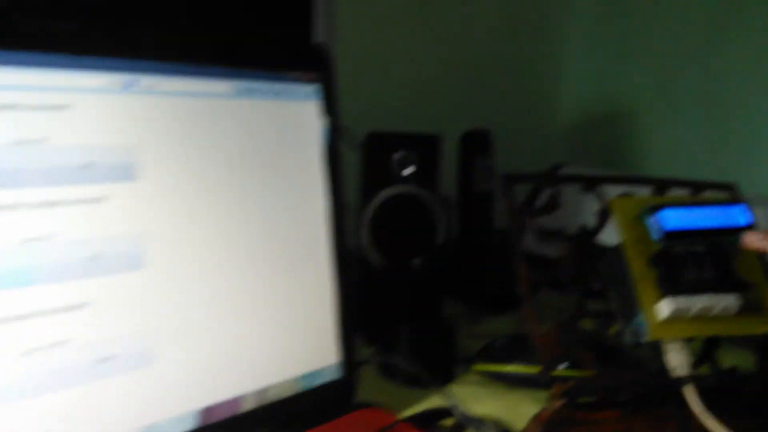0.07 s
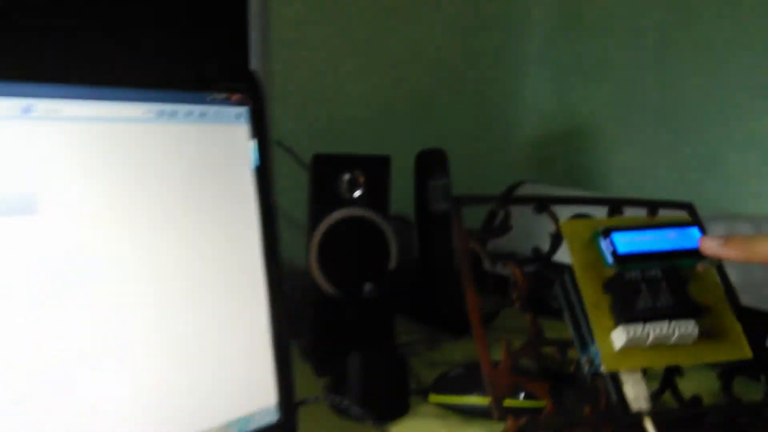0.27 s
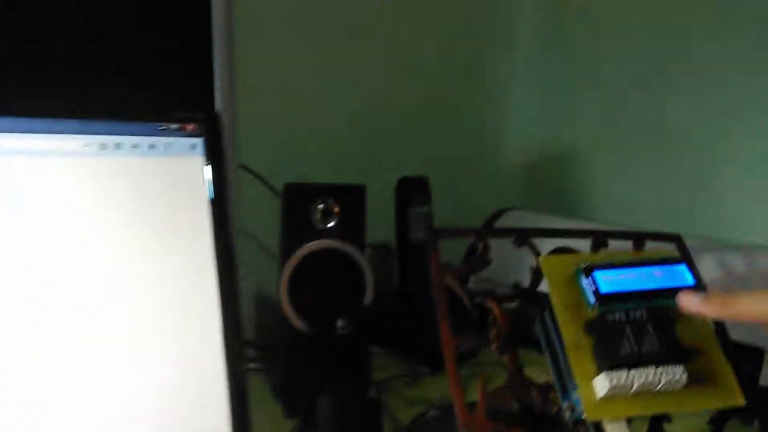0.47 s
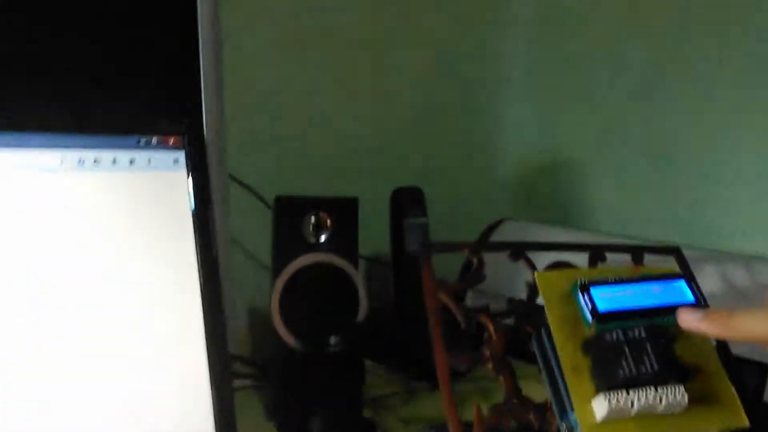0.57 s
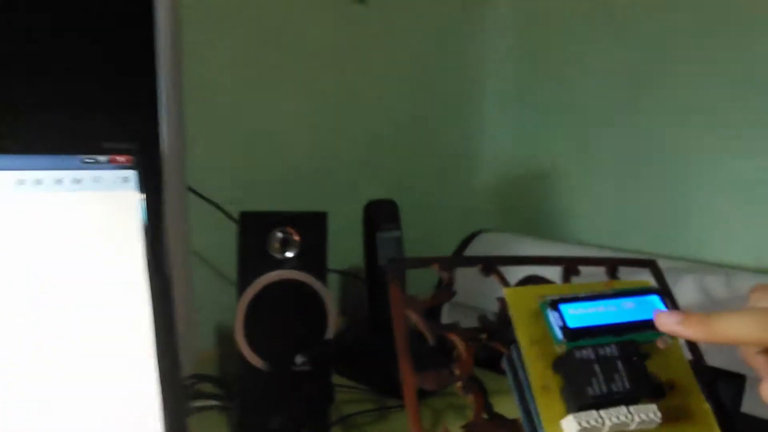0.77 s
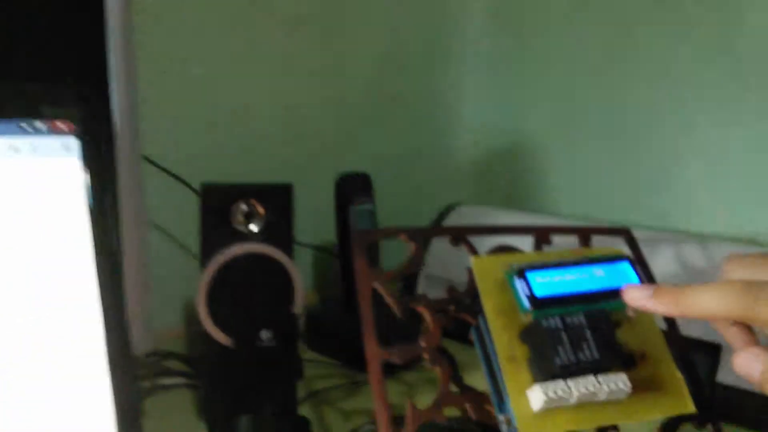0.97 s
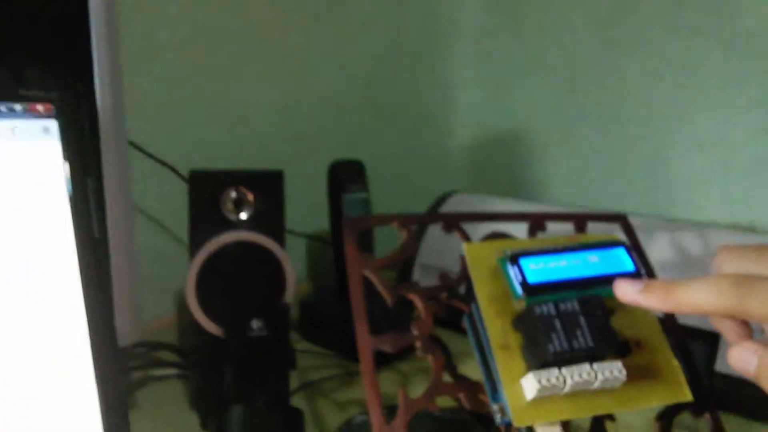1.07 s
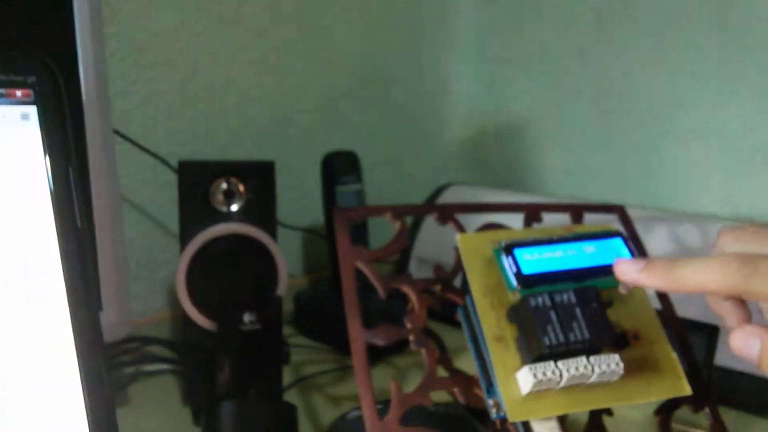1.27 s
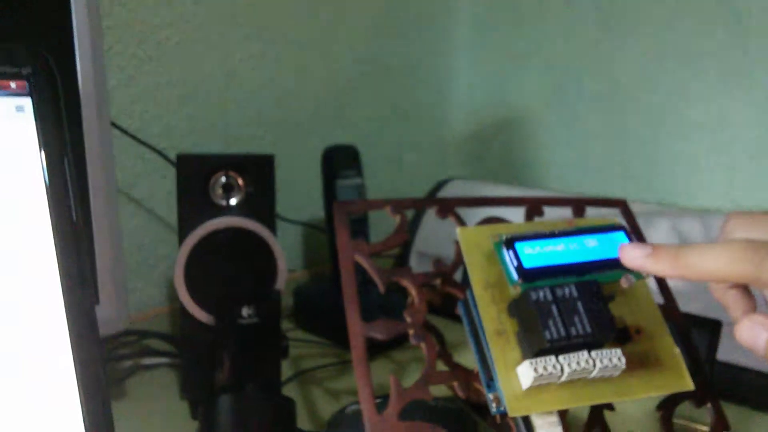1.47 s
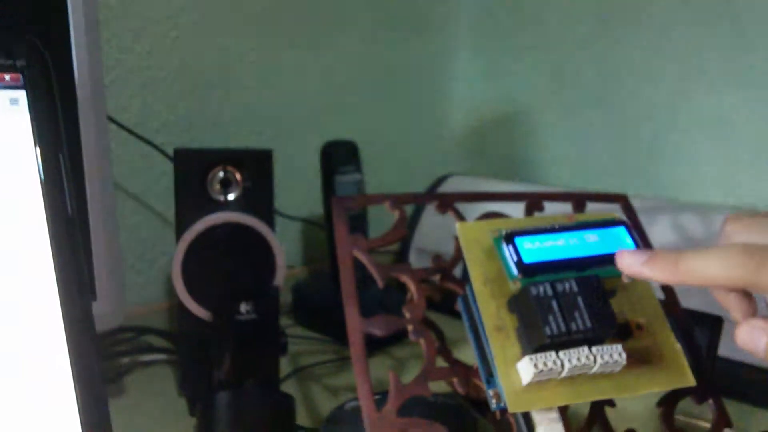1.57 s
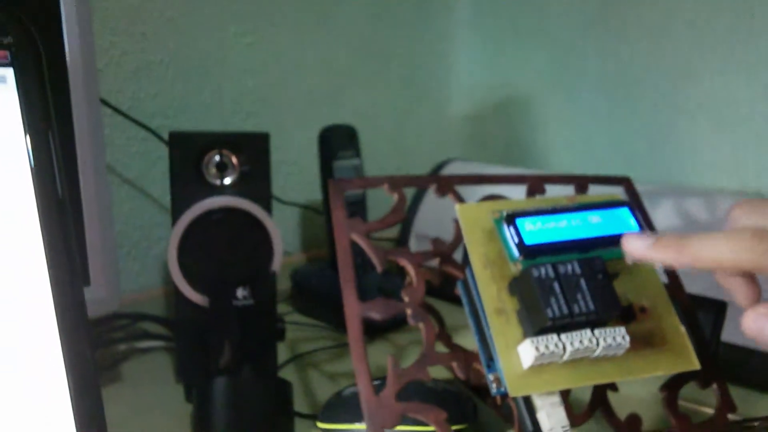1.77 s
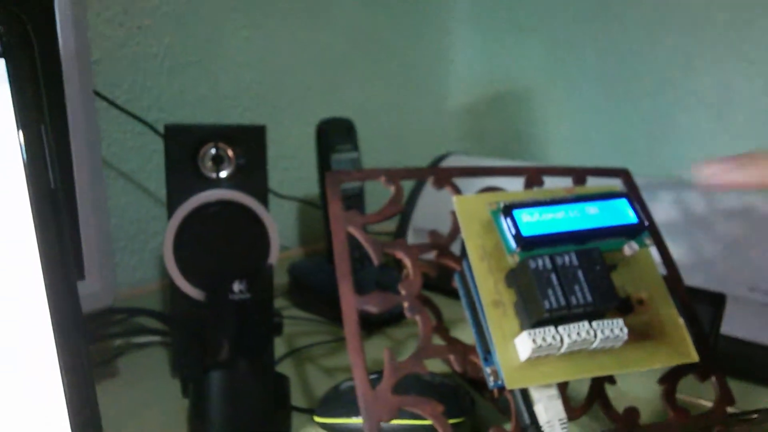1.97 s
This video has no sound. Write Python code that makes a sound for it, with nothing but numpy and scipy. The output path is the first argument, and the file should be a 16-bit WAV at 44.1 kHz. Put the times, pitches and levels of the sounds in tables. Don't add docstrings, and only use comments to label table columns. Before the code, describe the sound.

A relay on a bare circuit board switches on and off with seven short, bright clicks, evenly spaced, in a small hard room; close handheld microphone with faint hiss, fan whine and slight handling bumps.

```python
import sys
import numpy as np
from scipy import signal
from scipy.fft import rfft, irfft
from scipy.io import wavfile
from scipy.ndimage import uniform_filter1d

SR = 44100
rng = np.random.default_rng(int(sys.argv[2]) if len(sys.argv) > 2 else 0)


def output_pcm(signal):
    pcm = np.clip(np.atleast_2d(signal).T, -1, 1) * 32767
    wavfile.write(sys.argv[1], SR, np.round(pcm).astype(np.int16))


def how_loud(loudness_db):
    steps = np.asarray(loudness_db, float) / 20
    return 10 ** steps


N = 89567

# start_s, level_db, board_knock_db, spring_db, case_ring_db
PULL_INS = [
    (.0412, -27, -9, -5.5, 0),
    (.6503, -27, -0.5, -2, 0),
    (1.2482, -28.5, 0.5, 1, 2),
    (1.7686, -28.5, -0.5, 2.5, 3),
]
# start_s, level_db, board_knock_db, spring_db, case_ring_db
DROP_OUTS = [
    (.4104, -34, 3.5, -8, 0),
    (1.0015, -32, -6, -2, 1),
    (1.559, -34, -4.5, -3.5, 1.5),
]
# pitch_hz, level_db, t60_s, spread_hz
PULL_TONES = [(2060, -2.5, 0.049, 110), (7110, -6, 0.049, 760), (400.7, -51, .15, 99), (548, -50, 0.48, 37),
              (859, -38.5, 0.22, 100), (1219, -32.5, 0.13, 100), (1795, -20.5, 0.059, 280),
              (2131.5, -8.5, 0.1, 96), (2960, -22.5, 0.092, 37), (3167, -18.5, 0.11, 150),
              (4440, -19.5, 0.053, 150), (8186, -6.5, .05, 250), (8570, -4.5, 0.021, 160),
              (12340, 3, 0.016, 2000)]
DROP_TONES = [(2937, 1, 0.074, 67), (5150, -10, 0.18, 350), (393, -45.5, 0.11, 270), (583, -44, 0.37, 27),
              (1642, -19, 0.074, 150), (1828, -18.5, 0.13, 86), (2093, -11.5, 0.019, 89),
              (2320, -20, 0.24, 24.5), (2388, -14, .08, 31), (3100, -13.5, .07, 50),
              (4170, -14.5, 0.046, 450), (6875, -2.5, 0.031, 950), (8360, -6.5, 0.014, 910),
              (12800, 7, .013, 570)]
# pitch_hz, level_db (per Hz)
PULL_SIZZLE = [(400, -49.5), (1300, -28), (2100, -6), (3600, -11), (5300, -7.5), (8300, -1.5),
               (11000, -4.5), (16000, -5)]
DROP_SIZZLE = [(400, -50.5), (1200, -23.5), (2600, -0.5), (3600, -8.5), (5200, -2.5), (8000, -4.5),
               (12700, 0), (16000, -3.5)]
# bounce_gap_s, loss_per_bounce_db, sizzle_db, sizzle_t60_s, echo_db, late_wash_db
PULL_FEEL = (.0022, -1, 4.5, 0.0547, -5, -24)
DROP_FEEL = (.0015, -3.5, 6.5, 0.1128, -6.5, -19)
# pitch_hz, t60_s
ROOM_FADE = [(500, 0.82), (1500, 0.32), (3500, 0.26), (9000, 0.2), (15000, 0.043)]
# start_s, length_s, level_db, pitch_hz
BUMPS = [
    (0.044, 0.027, -61, 97.6),
    (0.092, 0.033, -65.5, 73.6),
    (0.269, 0.012, -60, 99),
    (0.289, 0.011, -60, 95),
    (0.311, 0.016, -58, 104),
    (.595, .02, -63, 85),
    (0.627, 0.026, -70, 45),
    (1.412, 0.018, -70.5, 91),
]
# pitch_hz, width_hz, level_db
FAN_TONES = [(860, 71, -86.5), (1141, 52, -77), (1324, 140, -75), (15550, 300, -78)]
# time_s, level_db
WHINE_LEVEL = [(0, -83.5), (.7, -81.5), (.92, -78), (1.401, -74), (2.03, -72.5)]
# pitch_hz, level_db (per Hz)
HISS_COLOUR = [(25, -42), (60, -18), (250, -12.5), (550, -12.5), (900, -0.5), (2200, -3), (4500, -10.5),
               (15500, -15)]

LATE_T60_S = 0.69


def relay():
    out = np.zeros(N)
    for row in PULL_INS:
        add(out, *stroke(row, PULL_TONES, PULL_SIZZLE, PULL_FEEL))
    for row in DROP_OUTS:
        add(out, *stroke(row, DROP_TONES, DROP_SIZZLE, DROP_FEEL))
    earlier_s, earlier_db = 0.17, -43.5
    t = np.arange(N) / SR
    fade = how_loud(earlier_db - 60 * (t + earlier_s) / LATE_T60_S)
    return out + fade * coloured(DROP_SIZZLE, N)


def stroke(row, tones, sizzle, feel):
    start_s, level_db, knock_db, spring_db, ring_db = row
    gap_s, loss_db, sizzle_db, sizzle_t60, echo_db, late_db = feel
    treble_rise_s, echo_rise_s = 0.00024, 0.0033
    extra_db = [knock_db, spring_db] + [ring_db * (tone[0] > 4000) for tone in tones[2:]]
    tones = [(hz, db + more, t60, spread) for (hz, db, t60, spread), more in zip(tones, extra_db)]
    t = np.arange(SR) / SR
    luck = rng.random((len(tones), 4))

    bounce = np.arange(4)[:, None]
    since = t - bounce * gap_s * (0.98 + 0.21 * luck[0, :, None])
    rattle = how_loud(loss_db * bounce - 60 * since / sizzle_t60) * np.clip(since / treble_rise_s, 0, 1)
    sound = how_loud(sizzle_db + ring_db) * rattle.max(0) * coloured(sizzle, SR)

    late_wash = how_loud(late_db - 60 * t / LATE_T60_S) * coloured(sizzle, SR)
    room = how_loud(echo_db) * room_echo(tones, sizzle, SR) + late_wash
    sound += room * (1 - np.exp(-(t / echo_rise_s) ** 2))

    for tone, chance in zip(tones, luck):
        sound += ringing_tone(t, tone, chance, treble_rise_s)
    return start_s, how_loud(level_db) * sound


def ringing_tone(t, tone, chance, treble_rise_s):
    hz, level_db, t60, spread = tone
    drive_s = 0.0041
    swing = t - 0.004
    treble = np.clip((hz - 3000) / 3000, 0, 1)
    rise = 1 - np.exp(-(t / max(2.42 / hz, treble_rise_s)) ** 3)
    held = np.maximum(t - drive_s * (1 - treble), 0)
    second_hz = hz + spread * (chance[1] - 0.5)
    third_hz = hz + spread * (chance[3] - 0.5)
    cluster = np.sin(2 * np.pi * (hz * swing + 0.42 * chance[0]))
    cluster += 0.5 * np.sin(2 * np.pi * (second_hz * swing + 0.62 * chance[2]))
    cluster += 0.55 * np.sin(2 * np.pi * (third_hz * t + chance[1]))
    return 2 * how_loud(level_db - 60 * held / t60) * rise * cluster


def room_echo(tones, sizzle, count):
    ring_db = -3
    hz = np.fft.rfftfreq(count, 1 / SR)
    power = how_loud(2 * read(sizzle, hz))
    power = power / power.sum()
    for tone_hz, db, t60, spread in tones:
        peak = 1 / (1 + ((hz - tone_hz) / (spread / 2 + 15)) ** 2) ** 2
        build_up = min(t60 / 0.036, 1) ** 2
        power = power + how_loud(2 * (db + ring_db)) * build_up * peak / peak.sum()
    noise = irfft(rfft(rng.standard_normal(count)) * np.sqrt(power * count / 2), count)
    band_hz, t, bands = signal.stft(noise, SR, nperseg=256)
    fade = how_loud(-60 * t / read(ROOM_FADE, band_hz)[:, None])
    return signal.istft(bands * fade, SR, nperseg=256)[1][:count]


def hand():
    rumble_db, rumble_hz = -83.5, 54.7
    out = how_loud(rumble_db) * evened(resonate(rng.standard_normal(N), rumble_hz, 40))
    for start_s, length_s, level_db, hz in BUMPS:
        t = np.arange(0, 2 * length_s, 1 / SR)
        swell = np.sin(np.pi * (t / length_s / 2) ** 0.6) ** 2
        thump = np.tanh(1.87 * np.sin(2 * np.pi * hz * t) + 0.44)
        add(out, start_s, how_loud(level_db) * swell * thump)
    return out


def fan():
    whine_hz, waver_hz = 1029, 5
    time_s, level_db = np.transpose(WHINE_LEVEL)
    waver, flutter = (evened(uniform_filter1d(rng.standard_normal(N), size=1500)) for _ in range(2))
    whine = np.sin(2 * np.pi * np.cumsum(whine_hz + waver_hz * waver) / SR)
    out = whine * how_loud(np.interp(np.arange(N) / SR, time_s, level_db) + 2.5 + 2 * flutter)
    for hz, width_hz, db in FAN_TONES:
        out += how_loud(db) * evened(resonate(rng.standard_normal(N), hz, width_hz))
    return out


def hiss():
    return how_loud(-69) * coloured(HISS_COLOUR, N)


def coloured(spectrum, count):
    hz = np.fft.rfftfreq(count, 1 / SR)
    return evened(irfft(rfft(rng.standard_normal(count)) * how_loud(read(spectrum, hz)), count))


def resonate(x, hz, width_hz):
    r = np.exp(-np.pi * width_hz / SR)
    return signal.lfilter([1 - r], [1, -2 * r * np.cos(2 * np.pi * hz / SR), r * r], x)


def evened(x):
    return x / np.sqrt(np.mean(x ** 2) + 1e-20)


def read(points, hz):
    point_hz, value = np.transpose(points)
    return np.interp(np.log(hz + 1), np.log(point_hz + 1), value)


def add(mix, start_s, sound):
    part = mix[round(start_s * SR):][:len(sound)]
    part += sound[:len(part)]


def scene():
    return (relay() + hand() + fan() + hiss())[None]


def band_limit(x):
    return signal.sosfilt(signal.butter(12, 17010, fs=SR, output="sos"), x)


def record(dry):
    treble_cut = signal.firwin(255, 15800, window=("kaiser", 5), fs=SR)
    bass_cut = signal.butter(2, 42, "high", fs=SR, output="sos")
    thin = signal.sosfilt(bass_cut, dry)
    mix = signal.oaconvolve(thin, treble_cut[None], "same")
    return band_limit(mix)


dry = scene()
out = record(dry)
output_pcm(out)
```